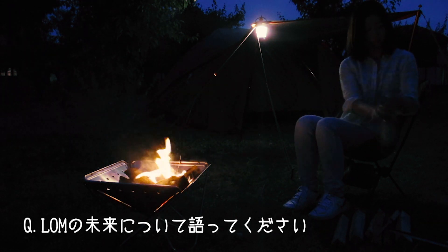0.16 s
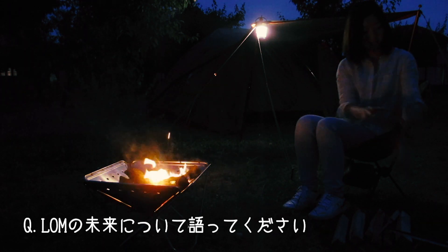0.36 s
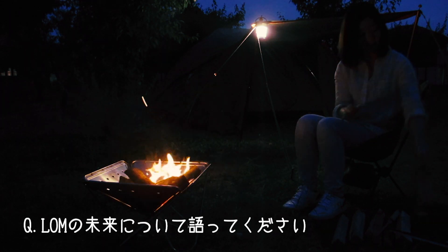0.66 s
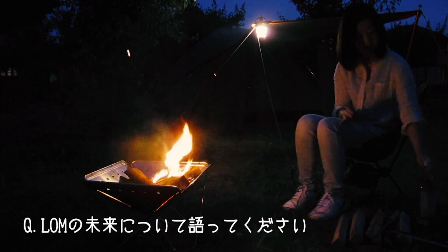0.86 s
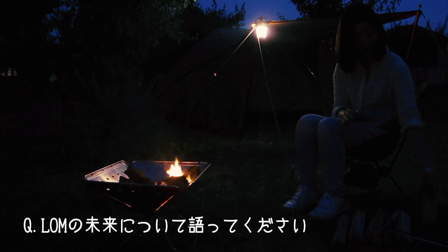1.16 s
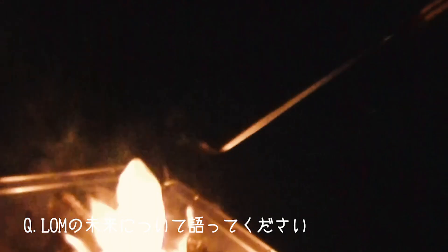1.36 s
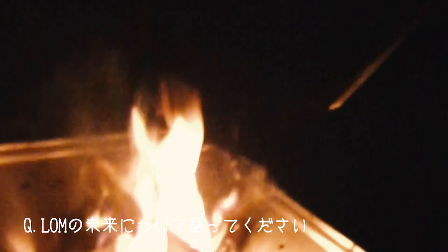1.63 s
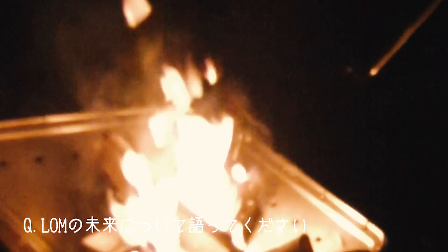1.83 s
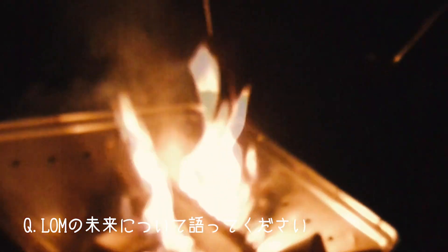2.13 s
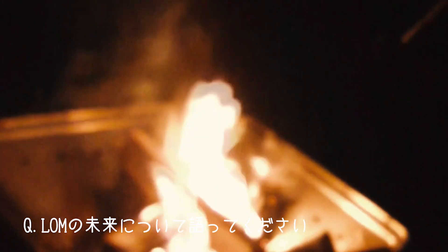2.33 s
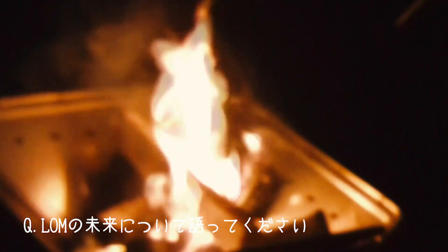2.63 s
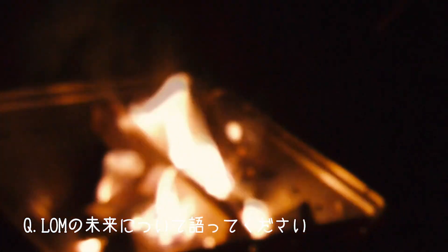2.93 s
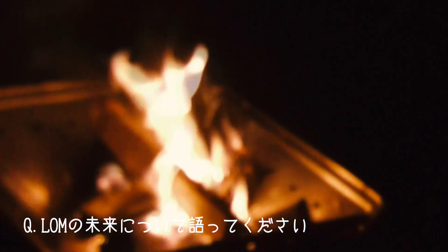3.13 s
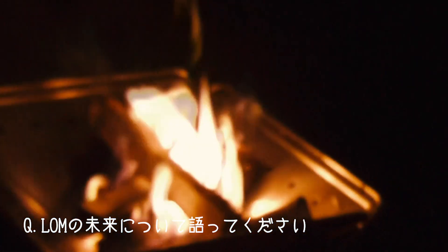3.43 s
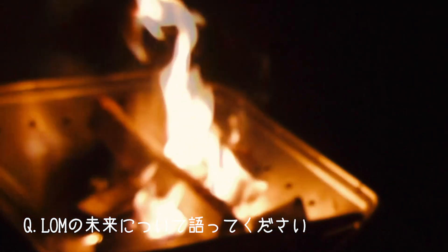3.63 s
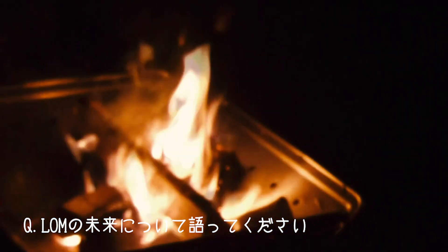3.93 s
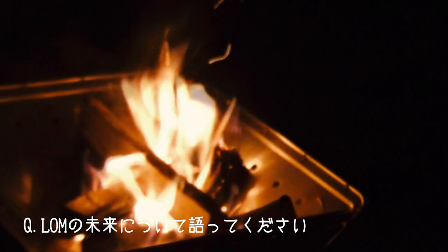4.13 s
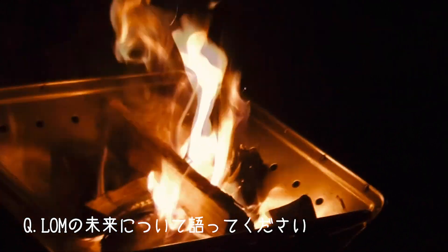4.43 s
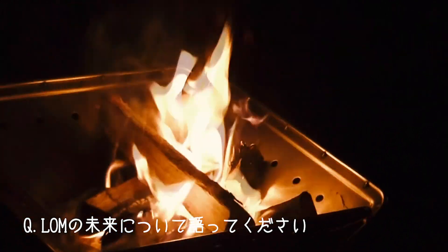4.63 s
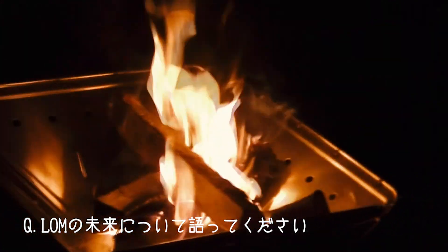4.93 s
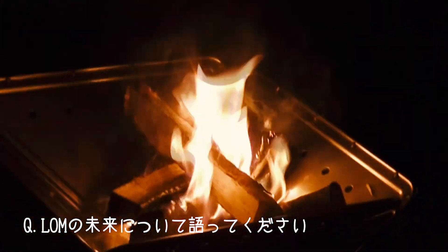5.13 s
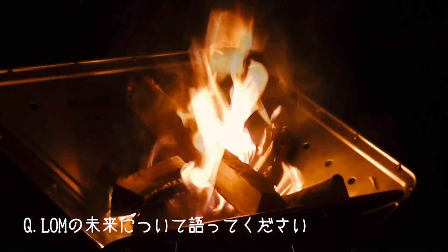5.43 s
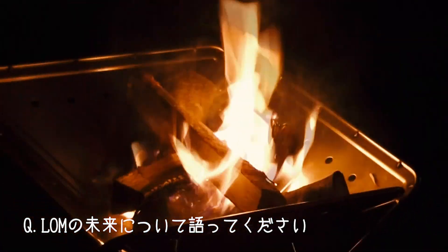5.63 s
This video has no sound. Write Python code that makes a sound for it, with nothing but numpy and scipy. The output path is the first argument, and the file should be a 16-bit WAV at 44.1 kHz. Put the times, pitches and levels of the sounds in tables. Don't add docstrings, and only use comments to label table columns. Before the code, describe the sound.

Close, dry stereo sound of a campfire in open air: deep gusty rumble, flapping flames, faint steamy hiss, and constant tiny ticks. Hollow knocks and crisp cracks scatter over it, with a loud cluster around two seconds. A cricket near the centre then sings nine brief, high, down-sliding trills before the fire crackles on alone, popping hard toward the end.

```python
import sys
import numpy as np
from scipy import signal
from scipy.fft import rfft, irfft, next_fast_len
from scipy.io import wavfile
from scipy.ndimage import uniform_filter1d, map_coordinates

SR = 44100
rng = np.random.default_rng(int(sys.argv[2]) if len(sys.argv) > 2 else 0)


def undo_db(level):
    steps = np.asarray(level, float) / 20
    return 10 ** steps


def unload_audio(sound):
    columns = np.transpose(np.atleast_2d(sound))
    steps = np.round(np.clip(columns, -1, 1) * 32767)
    wavfile.write(sys.argv[1], SR, steps.astype(np.int16))


N = 255020
TOP_HZ, HISS_TOP_HZ, EDGE_HZ = 16700, 15900, 250


# time in seconds, draught through the logs in dB, vigour of the flames in dB,
# flapping of the flame tongues in dB.
BURNING = [(0.0, -43.5, -58.5, -50.5), (0.92, -39, -57.5, -51), (1.13, -43, -59, -45.5),
           (1.43, -49, -60, -57), (1.63, -42, -64, -52.5), (2.74, -43.5, -63.5, -51.5),
           (2.86, -44.5, -60.5, -58.5), (2.96, -41, -61.5, -52), (3.9, -43.5, -61, -54.5),
           (4.02, -40, -61, -47.5), (4.1, -41.5, -62.5, -53), (4.18, -44, -62, -52.5),
           (4.6, -48.5, -62.5, -65), (4.64, -45.5, -63.5, -49.5), (4.96, -41, -63, -52),
           (5.01, -45, -62.5, -52.5), (5.49, -43, -62.5, -49.5), (5.78, -41.5, -63.5, -52)]
# frequency in Hz, level in dB per Hz.
RUMBLE_COLOUR = [(11, -49), (18, 8), (47, 0), (90, -14), (120, -47), (200, -120)]
# frequency in Hz, level in dB per Hz.
FLUTTER_COLOUR = [(47, -62), (80, -5), (97, -1), (145, -0.5), (215, -13), (300, -21), (390, -41),
                  (660, -120)]
# frequency in Hz, level in dB per Hz.
ROAR_COLOUR = [(160, 3.5), (280, 2), (625, -4.5), (930, -6), (2020, -13), (3000, -8), (3900, -90),
               (6600, -120)]


def flames():
    draught_db, vigour_db, flap_db = curves(BURNING)
    rumble = undo_db(draught_db + 2.5) * spread(rng.standard_normal((2, N)), RUMBLE_COLOUR)
    flutter = undo_db(flap_db + 0.5) * spread(rng.standard_normal((2, N)), FLUTTER_COLOUR)
    puffs = grainy(per_second=90, spread_db=4.0, grain_db=-1.0, grain_t60=0.019, patchy_db=1.5)
    flap_share = 0.29
    roar_db = vigour_db + 2 + flap_share * (flap_db - flap_db.mean()) + 1.05 * wobble(9)
    return rumble + flutter + undo_db(roar_db) * spread(puffs, ROAR_COLOUR)


# frequency in Hz, level in dB per Hz.
HISS_COLOUR = [(1530, -31), (2600, -4), (2960, -2.5), (3210, 0), (6200, 2), (8650, -8), (11100, -2),
               (13400, 2), (14900, 1.5), (15800, -7.5)]


def sizzle():
    mean_db, vigour_share = -58.5 + 3.5, 0.76
    sap = grainy(per_second=350, spread_db=1.5, grain_db=0, grain_t60=0.016, patchy_db=2.0)
    hiss = spread(sap, [(280, -76), (900, -4.5)] + HISS_COLOUR[1:])
    hiss = filtered(hiss, lambda hz: hz < HISS_TOP_HZ)
    return undo_db(mean_db + vigour_share * vigour_swing()) * hiss


def vigour_swing():
    vigour_db = curves(BURNING)[1]
    return vigour_db - vigour_db.mean()


# frequency in Hz, gain in dB.
MIC_OPENING = [(2000, 9), (5000, -4), (7000, 1.5), (8900, -5.5), (11500, 3), (14200, 1.5), (15700, -5)]


def pops():
    s, knock_hz, knock_db, crack_hz, crack_db, snap_db = bursts().T[:, :, None, None]
    t = np.arange(1500) / SR
    push_cycles, crack_s, snap_s = 0.18, 0.00042, 0.00035
    knock_q, crack_q, thump_db = 4.4, 3, -11
    slow = 1 + 0.75 * (np.maximum(knock_db, crack_db) < -43)

    def swell(length):
        return t / length * np.exp(-t / length)

    def tear(length):
        return rng.standard_normal((len(s), 2, len(t))) * swell(length * slow)

    def push(hz):
        return swell(push_cycles / hz) * [[1], [0]]

    def wood(f):
        knock = resonance(f, knock_hz, knock_hz / knock_q) * resonance(f, knock_hz, 2 * knock_hz)
        large = np.minimum(1, 1300 / knock_hz) ** 2
        return knock + undo_db(thump_db) * large * resonance(f, 660, 1600)

    def fibre(f):
        crack = resonance(f, crack_hz, crack_hz / crack_q) + 0.32
        return crack * resonance(f, 4260, 4640) ** 2 * undo_db(along(MIC_OPENING, f))

    def bright(f):
        return resonance(f, 13000, 7000) ** 2 * undo_db(along(MIC_OPENING, f))

    def ringing(shock, body, db, width_db):
        ring = filtered(shock, body)
        loudest = np.abs(uniform_filter1d(ring[:, :1] ** 2, size=66)).max(-1, keepdims=True)
        return undo_db(db) * ring / np.sqrt(loudest) * [[1], [undo_db(width_db)]]

    burst = ringing(push(knock_hz) + 0.05 * tear(0.0033), wood, knock_db + 2.5, width_db=-3)
    burst = burst + ringing(tear(crack_s) + 1.3 * push(crack_hz), fibre, crack_db - 0.5, width_db=-11)
    burst = burst + ringing(tear(snap_s), bright, snap_db - 2.5, width_db=-3)
    middle, side = burst[:, 0], burst[:, 1]
    burst = among_logs(np.stack([middle + side, middle - side], axis=1))
    top_hz = np.where(snap_db > -42.5, TOP_HZ, HISS_TOP_HZ)
    return lay(s[:, 0, 0], filtered(burst, lambda f: np.clip((top_hz - f) / EDGE_HZ, 0, 1)))


# delay in seconds, level in dB, lean to one side from -1 to 1.
ECHOES = [
    (.0068, -20, 0.12),
    (.0135, -39, -.3),
]


def among_logs(burst):
    t = np.arange(900) / SR
    late = rng.normal(1, 0.065, (len(burst), len(ECHOES)))

    def walls(f):
        total = 1
        for k, (delay, db, lean) in enumerate(ECHOES):
            sides = np.array([[1 + lean], [1 - lean]])
            total = total + undo_db(db) * sides * np.exp(-2j * np.pi * f * delay * late[:, k, None, None])
        return total

    rattle = rng.standard_normal((len(burst), 2, 900)) * undo_db(-60 * t / 0.039)
    rattle = filtered(rattle, lambda f: resonance(f, 1800, 9100) ** 3)
    rattle = undo_db(-14) * rattle / np.linalg.norm(rattle, axis=-1, keepdims=True)
    scatter = signal.fftconvolve(burst, rattle, axes=2)[..., :burst.shape[-1]]
    return filtered(burst, walls) + scatter


# start in seconds, knock in Hz, knock in dB, crack in Hz, crack in dB.
SHARP_POPS = [(0.1491, 1320, -44, 2500, -53), (0.6594, 1920, -46, 2600, -46),
              (.6935, 1400, -34.5, 2420, -31.5), (1.0299, 1230, -36, 2470, -35),
              (1.176, 1460, -46.5, 3440, -47), (1.4402, 750, -53, 2140, -46.5),
              (1.991, 1260, -34, 3900, -25), (2.096, 1190, -49, 2670, -48),
              (2.4076, 1390, -38, 3500, -37.5), (2.8898, 1270, -41.5, 5500, -47.5),
              (2.9622, 700, -47.5, 1950, -40.5), (3.8865, 970, -43.5, 3170, -41),
              (5.5537, 1320, -27.5, 4030, -33.5), (5.7055, 1440, -49, 3150, -47.5)]
# start in seconds, knock in Hz, knock in dB, crack in Hz, crack in dB.
DULL_POPS = [(.3184, 1370, -33.5, 2660, -35.5), (1.129, 1440, -31.5, 2090, -47),
             (1.2531, 644, -51, 4450, -53), (1.745, 570, -47.5, 2170, -50), (1.9366, 940, -34.5, 4400, -39),
             (2.2271, 1240, -35, 2800, -34), (2.231, 1240, -43, 2640, -46), (2.4159, 930, -45, 2500, -48),
             (2.4199, 1440, -41, 3540, -36.5), (2.5692, 570, -37.5, 3760, -36.5),
             (2.569, 1850, -35, 3760, -45), (4.021, 1400, -46.5, 3000, -47),
             (4.5711, 1000, -49.5, 2480, -55), (4.6017, 890, -49.5, 2790, -56),
             (4.899, 980, -48, 2630, -50), (4.929, 2380, -38, 3600, -40.5),
             (4.9465, 2550, -31, 3800, -34.5), (4.9477, 1590, -36.5, 5100, -36),
             (5.2698, 2290, -26.5, 4100, -28), (5.2724, 1390, -34, 1890, -45),
             (5.5624, 1310, -47, 4040, -64)]
# start in seconds, crack in Hz, crack in dB, snap in dB.
SPLITS = [(0.2822, 5540, -47.5, -55), (0.3817, 5300, -35.5, -38.5), (1.1917, 4070, -38.5, -41),
          (1.2131, 3000, -45, -65), (1.789, 4800, -47.5, -37.5), (1.823, 3160, -46.5, -46),
          (1.8984, 5330, -26.5, -23.5), (1.9939, 5430, -30, -36), (2.004, 4120, -45, -73),
          (2.5405, 5730, -43.5, -43.5), (2.5698, 5260, -29.5, -23.5), (2.644, 5000, -45, -47),
          (2.7173, 6140, -40, -38), (2.766, 6270, -41.5, -46), (3.1546, 4640, -44, -40.5),
          (3.4286, 5430, -46, -42.5), (3.7642, 4800, -40, -49), (3.864, 6200, -41, -58),
          (3.9093, 4870, -46.5, -45), (4.0476, 4870, -41.5, -40), (4.256, 6000, -46, -43),
          (4.495, 5200, -48, -49), (4.5921, 5100, -41.5, -41.5), (4.9163, 3670, -42.5, -67),
          (5.386, 4200, -47, -60), (5.599, 4550, -38.5, -50), (5.616, 2770, -43.5, -54),
          (5.759, 6100, -47, -50)]
# start in seconds, strength in dB, knock in Hz.
THUDS = [(0.38, -35.5, 1480), (0.464, -44.5, 956), (0.87, -54, 600), (0.897, -47, 1080), (0.964, -44, 1080),
         (0.987, -48, 1230), (1.007, -46, 1220), (1.094, -47, 1120), (1.302, -55, 830), (1.663, -50, 840),
         (2.443, -49, 649), (2.604, -49, 950), (2.78, -47.5, 810), (4.784, -50, 960), (4.957, -41, 1570),
         (5.314, -48, 926), (5.352, -44.5, 1060), (5.679, -57, 1010)]
# start in seconds, crack in dB, snap in dB.
TICKS = [(0.039, -68, -44.5), (0.304, -55, -42.5), (.493, -49, -43), (.5454, -50, -45), (.7314, -52, -49),
         (.737, -56, -47), (.8722, -50, -42), (0.901, -49, -67), (1.0944, -64, -42.5), (1.3018, -47, -52),
         (1.411, -46.5, -63), (1.506, -51, -61), (1.5241, -52, -45), (1.6647, -50.5, -47),
         (1.8532, -50, -40), (2.047, -67, -46), (2.7247, -61, -41), (2.819, -65, -47), (2.87, -53, -48),
         (3.2718, -59, -52), (3.4208, -56, -43.5), (3.4706, -53, -47), (3.607, -45, -58), (3.967, -53, -45),
         (4.0842, -48, -45), (4.1026, -46, -42.5), (4.249, -54, -45), (4.8894, -55, -44),
         (5.1462, -48, -48), (5.6797, -49.5, -44)]
# start in seconds, strength in dB.
SPARKS = [(0.748, -43), (0.7841, -45), (1.3994, -43), (1.6766, -47), (2.0874, -45), (2.145, -42),
          (2.4518, -38), (2.6124, -54), (3.0919, -43), (3.3744, -41), (3.4466, -43), (3.47, -45),
          (3.5618, -40), (3.612, -45), (3.7194, -49), (3.7432, -41), (3.846, -41), (3.9764, -42),
          (4.0083, -42), (4.6175, -41), (4.6867, -43), (5.0944, -41), (5.2074, -43), (5.3004, -41),
          (5.3142, -44), (5.3457, -41), (5.3654, -44), (5.444, -39)]


def bursts():
    ratio = 3.4
    tick_hz = 4230
    sharp = [(*row, -30.5 + 0.33 * row[-1]) for row in SHARP_POPS]
    dull = [(*row, row[-1] - 32) for row in DULL_POPS]
    splits = [(s, hz / ratio, db - 12.5, hz, db, snap) for s, hz, db, snap in SPLITS]
    thuds = []
    for s, db, hz in THUDS:
        knock_db = db - 6
        thuds.append((s, hz, knock_db, hz * ratio, knock_db - 9.5, knock_db - 3))
    stray = [(s, db - 11.5, db - 8.5) for s, db in SPARKS]
    ticks = []
    for s, crack_db, snap_db in TICKS + stray:
        crack_hz = tick_hz * np.exp(rng.normal(0, 0.32))
        ticks.append((s, tick_hz / ratio, -64, crack_hz, crack_db, snap_db))
    return np.array(sharp + dull + splits + thuds + ticks)


def cricket():
    start_hz, fall_hz, curve, stroke_s, skew = 4245, 790, 1.32, .0142, .8
    octave_db, pan_db = -31, 1.3
    s, db = strokes().T[:, :, None]
    weak = np.clip((-36 - db) / 10, 0, 1)
    length = stroke_s * (1 - .2 * weak)
    t = np.arange(900) / SR
    u = np.clip(t / length, 0, 1)
    draw = rng.standard_normal((len(s), 2))
    hz = start_hz - 150 * weak + 25 * draw[:, :1] - fall_hz * (t / stroke_s) ** curve
    phase = 2 * np.pi * (np.cumsum(hz, axis=1) / SR + draw[:, 1:])
    teeth = 1 + .3 * uniform_filter1d(rng.standard_normal(phase.shape), size=40)
    swell = np.abs(np.sin(np.pi * u ** skew)) ** skew
    tone = undo_db(db) * swell * teeth * (np.sin(phase) + undo_db(octave_db) * np.sin(2 * phase))
    direct = lay(s[:, 0] - .43 * length[:, 0], tone[:, None] * undo_db([[pan_db], [-pan_db]]))
    grass = rng.standard_normal((2, 4000)) * undo_db(-60 * np.arange(4000) / SR / 0.012)
    grass = grass / np.linalg.norm(grass[0])
    return direct + undo_db(-20) * signal.fftconvolve(direct, grass, axes=1)[:, :N]


# second stroke in seconds, last stroke in seconds, opening level in dB,
# full level in dB, change of the last stroke in dB.
TRILLS = [
    (2.4537, 2.5174, -52, -40, -9),
    (2.7033, 2.8045, -55.5, -37.5, -0.5),
    (2.968, 3.0713, -54, -36, -1.5),
    (3.2312, 3.3348, -45.5, -36, -1.5),
    (3.482, 3.565, -45, -35.5, -1),
    (3.731, 3.8116, -42.5, -36.5, 0),
    (3.9953, 4.0775, -46.5, -36.5, 0),
    (4.2741, 4.3573, -42.5, -35.5, -.5),
    (4.565, 4.6267, -42, -36, -.5),
]


def strokes():
    gap_s, lead_in_s = .0206, .0176
    shortfall_left = .35
    rows = []
    for second, last, opening_db, full_db, falter_db in TRILLS:
        beat = np.linspace(second, last, 1 + round((last - second) / gap_s))
        s = np.r_[second - lead_in_s, beat]
        db = full_db + (opening_db - full_db) * shortfall_left ** np.arange(len(s))
        db = db + falter_db * (s == s[-1])
        rows += zip(s, db)
    return np.array(rows) + rng.standard_normal((len(rows), 2)) * [.0004, .6]


def grainy(per_second, spread_db, grain_db, grain_t60, patchy_db):
    draw = rng.random((2, N))
    starts = draw[0] < per_second / SR
    size = undo_db(np.minimum(-spread_db * np.log(1 - draw[1]), 15)) * starts
    fade = undo_db(-60 * np.arange(1200) / SR / grain_t60)
    swell = signal.fftconvolve(size, fade)[:N]
    hiss = rng.standard_normal((2, N)) * undo_db(patchy_db * wobble(30))
    return hiss + undo_db(grain_db) * unit(swell * rng.standard_normal((2, N)))


# frequency in Hz, likeness from 0 to 1.
EARS_ALIKE = [(60, 0.99), (150, 1), (300, 0.98), (1400, 0.9), (3100, 0.68), (6800, 0.13), (15000, 0.057)]


def spread(pair, spectrum):
    def turn(hz):
        return np.arccos(np.clip(along(EARS_ALIKE, hz), -1, 1)) / 2

    def colour(hz):
        return undo_db(along(spectrum, hz)) * [np.cos(turn(hz)), np.sin(turn(hz))]

    mid, side = filtered(pair, colour)
    return unit(np.array([mid + side, mid - side]))


def unit(x):
    return x / np.sqrt(np.mean(x ** 2) + 1e-20)


def along(points, hz):
    f, v = np.transpose(points)
    return np.interp(np.log(hz + 1), np.log(f + 1), v)


def curves(rows):
    s, *cols = np.transpose(rows)
    return [np.interp(np.arange(N) / SR, s, c) for c in cols]


def wobble(rate):
    knots = rng.standard_normal(int(N * rate / SR) + 4)
    return map_coordinates(knots, [np.arange(N) * rate / SR])


def filtered(x, response):
    m = next_fast_len(x.shape[-1] + 4096)
    return irfft(rfft(x, m) * response(np.fft.rfftfreq(m, 1 / SR)), m)[..., :x.shape[-1]]


def resonance(f, hz, width_hz):
    return 1j * f * width_hz / (hz * hz - f * f + 1j * f * width_hz)


def lay(times, sounds):
    at = np.round(times * SR).astype(int)[:, None] + np.arange(sounds.shape[-1])
    return np.array([np.bincount(at.ravel(), sounds[:, c].ravel(), N + SR)[:N] for c in (0, 1)])


def scene():
    return flames() + sizzle() + pops() + cricket()


def low_pass(x):
    return signal.sosfilt(signal.butter(12, 16850, fs=SR, output="sos"), x)


def record(dry):
    mix = filtered(dry, lambda hz: np.clip((TOP_HZ + EDGE_HZ - hz) / EDGE_HZ, 0, 1))
    return low_pass(mix)


dry = scene()
out = record(dry)
unload_audio(out)
```